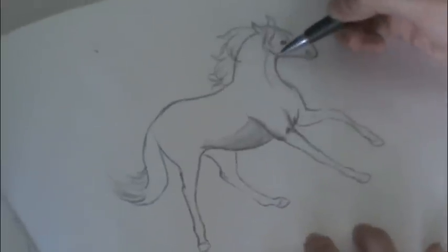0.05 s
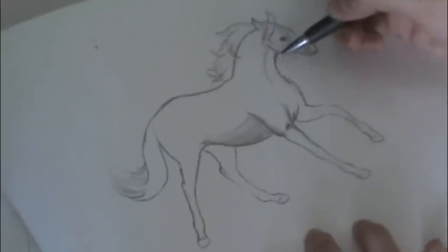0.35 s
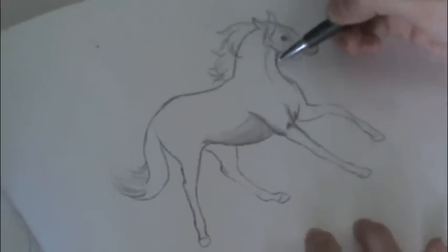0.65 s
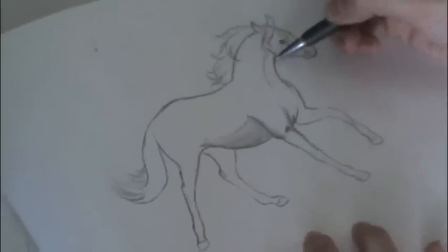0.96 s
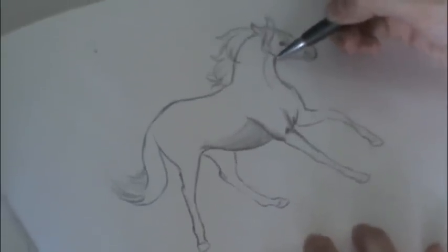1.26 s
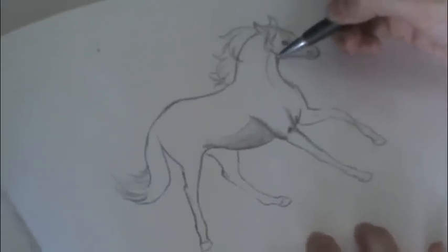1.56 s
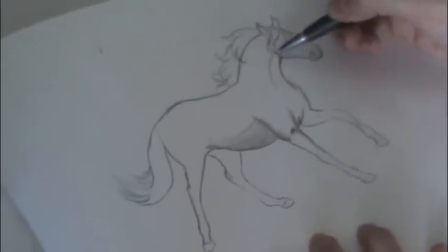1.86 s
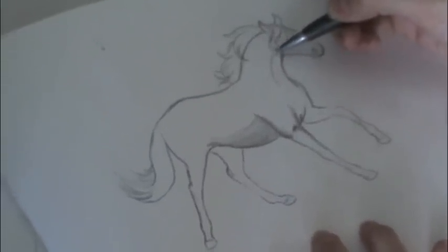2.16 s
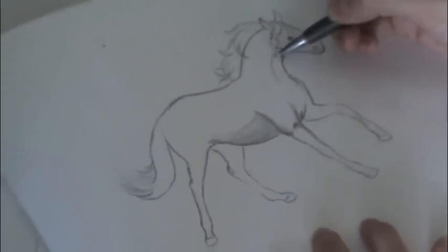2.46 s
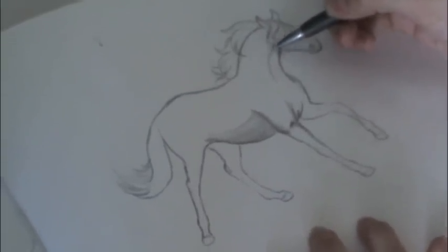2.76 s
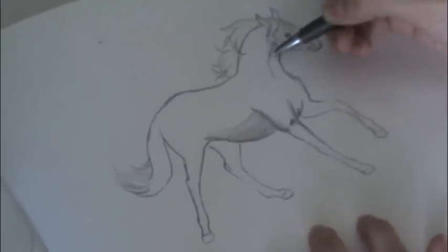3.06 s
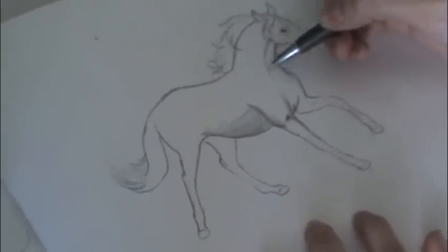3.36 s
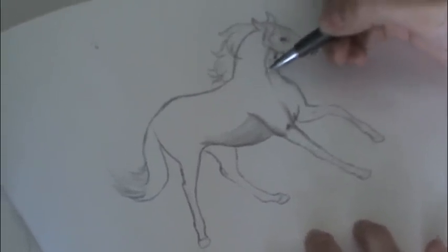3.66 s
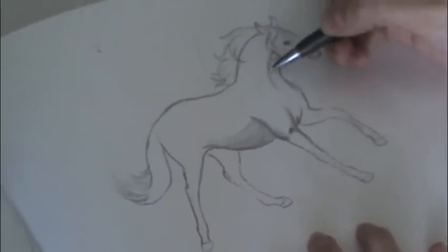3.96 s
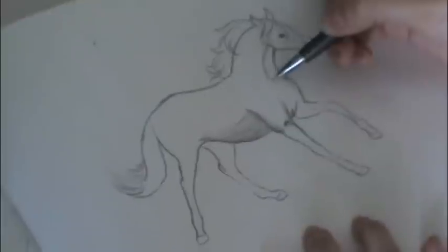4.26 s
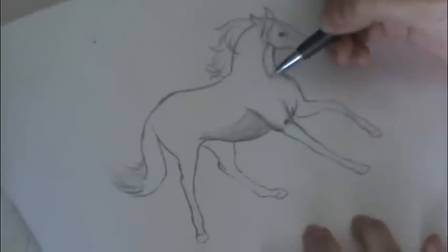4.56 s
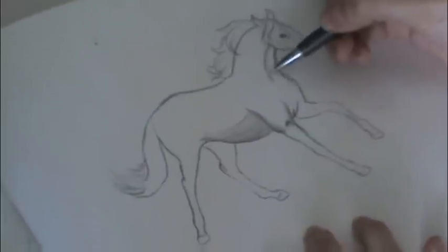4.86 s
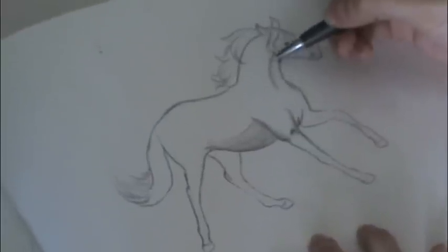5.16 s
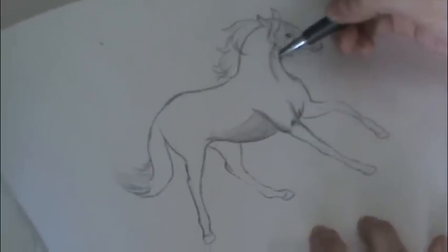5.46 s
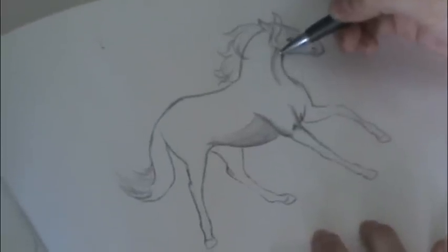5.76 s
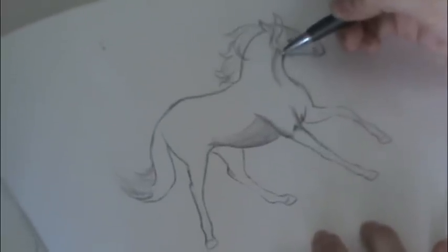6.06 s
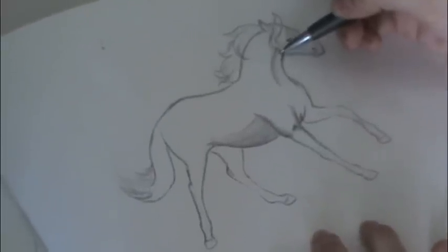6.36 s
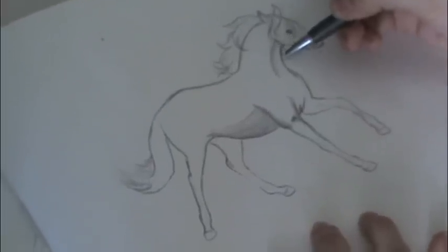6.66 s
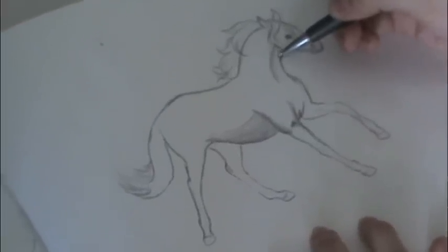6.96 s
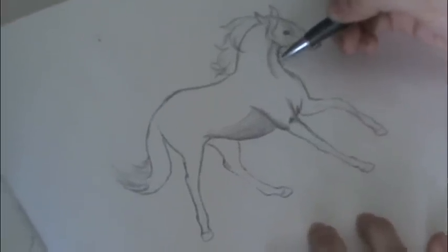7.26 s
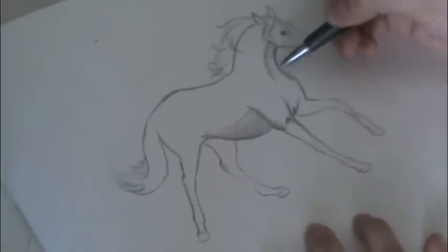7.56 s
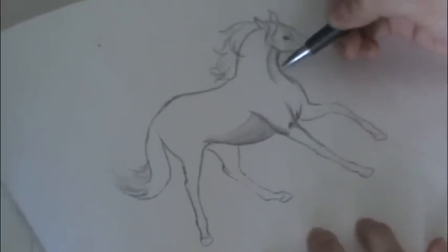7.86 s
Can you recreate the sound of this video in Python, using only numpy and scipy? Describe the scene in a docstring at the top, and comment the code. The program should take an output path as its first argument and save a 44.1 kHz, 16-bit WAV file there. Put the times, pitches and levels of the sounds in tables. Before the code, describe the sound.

A pencil shades on paper in short, quick, scratchy strokes, close up, over a low hum and soft room hiss.

```python
"""A pencil shades a drawing, close to the microphone on a desk in a small room.
Each stroke is pulled across the paper, then the lead glides back: at first the way back is all but
silent, by the end the pencil rubs evenly to and fro. The lead catches on the tooth of the paper,
pencil and sheet ring, and the desk reflects the scratch; now and then the tip knocks or snags.
Under it lie room hiss, a low electrical hum and faint electronic pips from the camera."""
import sys
import numpy as np
from scipy import signal
from scipy.fft import rfft, irfft
from scipy.io import wavfile
from scipy.ndimage import uniform_filter1d

SR = 44100
rng = np.random.default_rng(int(sys.argv[2]) if len(sys.argv) > 2 else 0)


def wav_out(sig):
    """Save sig, one row per channel (or a flat mono array), as 16-bit PCM at SR to the path in sys.argv[1]."""
    wavfile.write(sys.argv[1], SR, np.round(np.clip(np.atleast_2d(sig).T, -1, 1) * 32767).astype(np.int16))


N = 357210
TIME, FREQ = np.arange(N) / SR, np.fft.rfftfreq(N, 1 / SR)


def amp(db):
    """Decibels to gain."""
    return 10 ** (np.asarray(db) / 20)


def unit_rms(x):
    """Scales to an rms of 1."""
    return x / np.sqrt(np.mean(x ** 2) + 1e-20)


def curve_at(points, hz):
    """Interpolates rows of frequency and value on a log-frequency axis."""
    point_hz, value = np.transpose(points)
    return np.interp(np.log(hz + 1), np.log(point_hz + 1), value)


def add(mix, s, sound):
    """Adds a sound to the mix at s seconds."""
    part = mix[..., max(round(s * SR), 0):][..., :sound.shape[-1]]
    part += sound[..., :part.shape[-1]]


def wander(hz):
    """A random drift of rms 1, mostly slower than hz."""
    return unit_rms(irfft(rfft(rng.standard_normal(N)) / (1 + (FREQ / hz) ** 4), N))


def panned(db):
    """Left and right gains, the left louder by db."""
    return amp(np.array([[.5], [-.5]]) * db)


def stereo_pair(spectra, likeness):
    """Turns two unrelated spectra into left and right of the given likeness."""
    same = np.clip(curve_at(likeness, FREQ), -1, 1)
    mid, side = np.sqrt((1 + same) / 2) * spectra[0], np.sqrt((1 - same) / 2) * spectra[1]
    return np.array([mid + side, mid - side])


def hiss(level_db=-54.0, flutter_db=.5):
    """Steady noise of room and microphone, alike on both sides in the bass."""
    # The colour of the hiss. Each row: frequency in Hz, relative level in dB.
    colour = [(20, 1), (45, 3.5), (75, 1), (100, 6), (140, 7.5), (190, -4), (250, .5), (330, -0.5),
              (700, -4), (1500, -6), (3000, -11.5), (6000, -16), (15500, -21)]
    # Each row: frequency in Hz, likeness of left and right from -1 to 1.
    likeness = [(100, 1), (200, 0.74), (400, 0.024), (1200, -0.56), (3000, -0.14), (6000, 0.2),
                (12000, 0.99)]
    spectra = stereo_pair(rfft(rng.standard_normal((2, N))), likeness) * amp(curve_at(colour, FREQ))
    return amp(level_db + flutter_db * wander(24)) * unit_rms(irfft(spectra, N)) * panned(0.44)


def hum(hum_hz=58.75, drone_hz=74.4, drone_db=-62.5, waver_db=0.72, drift_rad=0.054, swell_db=1):
    """A low electrical hum grows a little and beats with a faint drone; thin whines sit above it."""
    # The hum's harmonics from the first up, each a level in dB before waver and swell.
    harmonics = [-43.5, -51.5, -73.5, -70, -76]
    # Steady whines of the electronics. Each row: frequency in Hz, level in dB.
    whines = [(360.5, -75.5), (537, -76), (780.4, -73.5), (839, -83), (1259, -74.5), (2514, -87),
              (3581, -106), (15735, -79)]
    phase = 2 * np.pi * hum_hz * TIME + drift_rad * wander(1.0)
    low = sum(amp(db) * np.cos(k * phase) for k, db in enumerate(harmonics, 1))
    low *= amp(waver_db * wander(2.8) + swell_db * (TIME / TIME[-1] - 1.5))
    low += amp(drone_db) * np.sin(2 * np.pi * drone_hz * TIME + wander(2.8))
    thin = sum(amp(db) * np.sin(2 * np.pi * hz * TIME + .5 * wander(3.9)) for hz, db in whines)
    return np.sqrt(2) * (low * panned(0.47) + thin)


def camera_pips(frames_per_s=30, length_s=.02, uneven_db=3, detune=0.0069):
    """The camera's electronics pip faintly in step with its frames, each pip a little off in pitch."""
    # Each row: start and end in seconds, pitch in Hz, typical peak in dB, pips per second.
    trains = [(.23, .37, 1390, -57, 7.5), (0.467, .94, 1377, -58, 15), (1.094, 1.32, 1400, -58, 15),
              (0.43, 1.04, 1913, -59, 15), (1.13, 1.33, 1910, -57, 15), (0.329, 1.38, 3605, -66.5, 30),
              (2.325, 3.4, 3400, -65.5, 15), (3.997, 5.24, 3600, -64, 30), (4.235, 4.45, 1397, -57, 15),
              (4.569, 5.2, 1200, -61.5, 30), (5.3, 6.74, 3085, -63.5, 30), (7.004, 8.1, 3582, -60.5, 30),
              (7.005, 8.1, 1193, -61.5, 30)]
    out, t = np.zeros((2, N)), TIME[:round(length_s * SR)]
    for start, end, hz, db, per_s in trains:
        times = np.arange(start, end, max(round(frames_per_s / per_s), 1) / frames_per_s)
        for s, (size, skew, pitch) in zip(times, rng.random((64, 3))):
            cycles = hz * (s + t + detune * (2 * pitch - 1) * (t - length_s / 2))
            stereo_shift = np.array([[0], [(skew - .5) / 2]])
            pip = np.sin(2 * np.pi * (cycles + stereo_shift)) * np.hanning(len(t))
            add(out, s - length_s / 2, amp(db + uneven_db * (2 * size - 1)) * pip)
    return out


def room(x, t60=0.25, dull_hz=7000, gap_s=.006):
    """The walls of the small room return a short, diffuse, slightly dull tail."""
    t = TIME[:SR // 2]
    tail = rng.standard_normal((2, len(t))) * 1000 ** (-t / t60) * (t > gap_s)
    wet = signal.fftconvolve(x, tail / np.linalg.norm(tail[0]), axes=1)[:, :N]
    return irfft(rfft(wet) / np.hypot(1, FREQ / dull_hz), N)


def tap(hz, octaves, t60, rise_s=0.0001):
    """One jolt of the tip: a dying band of noise, peak 1; the brighter, the more alike on both sides."""
    t = TIME[:4096]
    octaves_off = np.log2((np.fft.rfftfreq(len(t), 1 / SR) + 1) / hz)
    band = 1 / (1 + (octaves_off / octaves) ** 2)
    noise = rng.standard_normal((2, len(t))) + (1 + (hz / 3500) ** 2) * rng.standard_normal(len(t))
    burst = irfft(rfft(noise) * band) * 1000 ** (-t / t60) * (1 - np.exp(-t / rise_s))
    return burst / abs(burst).max()


def knocks_and_snags():
    """The tip knocks the sheet on the desk, or snags in mid-stroke and sets the pencil ringing."""
    # Each row: time in seconds, peak in dB before panning, centre in Hz, half-width in octaves.
    knocks = [(.207, -42.5, 1630, 0.64), (.457, -40, 2300, 1.9), (1.408, -38, 1700, 0.88),
              (2.243, -37.5, 1330, .7), (2.878, -44.5, 1610, .7), (3.484, -42.5, 2320, 0.36),
              (5.124, -43, 1720, .8), (5.394, -35.5, 1500, 2), (5.624, -42, 930, .4),
              (6.472, -41.5, 3040, .4), (6.613, -44, 1690, .4), (7.498, -46, 1300, 1.1),
              (7.548, -45, 1880, 0.45)]
    # Each row: time in seconds, peak in dB before panning.
    snags = [(2.733, -42), (3.454, -40.5), (4.774, -37), (6.918, -42), (7.350, -35)]
    out = np.zeros((2, N))
    for s, db, hz, octaves in knocks:
        add(out, s, amp(db) * panned(1.5) * tap(hz, octaves, t60=.028))
    for s, db in snags:
        add(out, s, amp(db) * panned(1) * tap(hz=7300, octaves=.16, t60=.036))
    return out


def fibre_slips(per_s=6000, spread_db=1.5):
    """Tiny slips of the lead over paper fibres, a few larger, over an equally strong smooth rub."""
    sizes = amp(spread_db * np.minimum(rng.exponential(1, N), 4.5))
    slips = sizes * (rng.random(N) < per_s / SR)
    return unit_rms(slips * rng.standard_normal((2, N))) + rng.standard_normal((2, N))


def rolling_tip(x, patch_db=2.5, patch_frames=20, patch_bins=7):
    """The contact point rolls on the lead, so the colour drifts in patches of time and pitch."""
    spectra = signal.stft(x, nperseg=512, noverlap=448)[2]
    patches = uniform_filter1d(rng.standard_normal(spectra.shape[1:]), patch_frames, axis=1)
    patches = unit_rms(uniform_filter1d(patches, patch_bins, axis=0))
    return signal.istft(spectra * amp(patch_db * patches), nperseg=512, noverlap=448)[1][:, :N]


def rubbing():
    """Lead drawn steadily over paper: fibre slips ring sheet and pencil and echo off the desk."""
    # The broad colour of lead on paper. Each row: frequency in Hz, relative level in dB.
    rasp = [(150, -30.5), (500, -1.5), (1000, -10), (1400, -18), (3200, -9), (4200, -11.5), (5600, -8),
            (9200, -7), (11000, -10), (12000, -15), (15500, -16)]
    # Resonances of sheet and pencil. Each row: centre in Hz, width in Hz, lift in dB.
    resonances = [(1703, 550, 15), (2380, 230, 11), (4500, 140, 9), (5880, 45, 4), (6360, 48, 0),
                  (7220, 630, 9), (7400, 48, -12), (7900, 99, -0.5), (7870, 66, 5), (8530, 360, 3),
                  (10160, 480, 5), (14000, 400, 0)]
    # Reflections from desk, hand and camera. Each row: delay in seconds, signed gain.
    echoes = [(.001338, -.2), (.002041, -.16), (.002698, -.14), (.007755, -.18), (.008186, .27)]
    # Each row: frequency in Hz, likeness of left and right from -1 to 1.
    likeness = [(500, 1), (1200, -0.057), (1800, 1), (3000, 0.78), (5000, 0.93), (8000, 0.94), (14000, 1)]
    # The balance at the microphone. Each row: frequency in Hz, left over right in dB.
    balance = [(1000, -0.5), (2000, 2.5), (4000, 0.5), (7000, 2), (8500, 0.5), (12000, 0)]
    slips = stereo_pair(rfft(fibre_slips()), likeness)
    ring_db = sum(db / (1 + (2 * (FREQ - hz) / width) ** 2) for hz, width, db in resonances)
    colour_db = curve_at(rasp, FREQ) + ring_db
    # minimum phase: the ringing follows each slip
    log_gain = np.log(amp(np.r_[colour_db, colour_db[-2:0:-1]]))
    body = np.exp(np.conj(signal.hilbert(log_gain)))[:len(FREQ)]
    reflections = 1 + sum(gain * np.exp(-2j * np.pi * FREQ * s) for s, gain in echoes)
    at_microphone = slips * body * reflections * panned(curve_at(balance, FREQ))
    return unit_rms(rolling_tip(irfft(at_microphone, N)))


def lead_pass(rub, s, length_s, db, lean_db, firm_db=-52.5, edge_hz=9400, edge_db=1.9, edge_rise_db=4):
    """One pass swells and fades; the light touch at its ends, most as it lifts, leaves a fine edge."""
    # The colour drifts as the lead wears and turns.
    # Each row: time in seconds, then lifts in dB of the sheet's body, coarse rasp and fine treble.
    wear = [(0, 1, 2, -5.5), (2.9, 1.5, 5, -2), (3.7, -2, -1, -1.5), (4.7, 1.5, 2, 0), (5.4, -1.5, 2.5, -2),
            (6.2, -3.5, 0, -2.5), (6.9, -1.5, 4, -7), (8.1, -5.5, -6, -5.5)]
    progress = np.linspace(0, 1, round(length_s * SR))
    hz = np.fft.rfftfreq(len(progress), 1 / SR)
    pressure = abs(np.sin(np.pi * progress))
    times, *bands = np.transpose(wear)
    body_db, rasp_db, treble_db = (np.interp(s, times, band) for band in bands)
    # a lighter touch rings the pencil less, so the bands either side of its ring stand out
    lighter_db = firm_db - db
    colour = [(4000, body_db + 0.27 * lighter_db), (6200, rasp_db + 0.17 * lighter_db),
              (7200, 0), (8300, 0), (10300, treble_db + 0.52 * lighter_db)]
    spectra = rfft(rub[:, round(s * SR):][:, :len(progress)]) * amp(curve_at(colour, hz))
    below_edge = 1 / (1 + (hz / edge_hz) ** 20)
    body = irfft(spectra * below_edge, len(progress)) * pressure ** 0.83
    edge = irfft(spectra * (1 - below_edge), len(progress)) * pressure ** 0.7
    edge *= amp(edge_db + edge_rise_db * (progress - .5))
    return (body + edge) * amp(db + lean_db * (progress - .5))


def shading(gain_db=.5, back_ratio=1.07, back_lean_db=-1.6, shortest_s=.02):
    """Every stroke is a pull and then a glide back, cut short if the next stroke comes first."""
    # Each row: start and length of the pull in seconds, base levels of pull and way back in dB.
    strokes = [(0.253, 0.12, -55.5, -85), (0.632, 0.09, -51, -83), (0.979, 0.088, -56, -83),
               (1.219, 0.088, -56.5, -70), (1.415, 0.077, -64, -72), (1.612, 0.079, -58.5, -66),
               (2.018, 0.074, -53, -63), (2.228, 0.092, -53.5, -64.5), (2.429, 0.11, -50, -64.5),
               (2.646, 0.13, -50, -61), (2.88, 0.13, -49.5, -63), (3.112, 0.11, -49, -82),
               (3.35, 0.152, -50, -75), (3.566, 0.13, -54.0, -65), (3.734, 0.13, -51, -68),
               (3.939, 0.16, -49, -70), (4.151, 0.141, -55.5, -77), (4.351, 0.17, -51, -53),
               (4.7, 0.15, -52.5, -56.5), (4.952, 0.12, -56, -58.5), (5.171, 0.1, -49.5, -55.5),
               (5.357, 0.11, -51.5, -55), (5.538, 0.114, -50.5, -56.5), (5.726, 0.086, -54, -58.5),
               (5.886, 0.073, -57.5, -63), (6.05, 0.069, -61, -55.5), (6.275, 0.085, -58, -57.5),
               (6.452, 0.11, -53.5, -53.5), (6.662, 0.097, -51, -53.5), (6.881, 0.1, -49.0, -53),
               (7.088, 0.11, -48.5, -51), (7.302, 0.11, -48, -53), (7.538, 0.118, -48.5, -50),
               (7.78, 0.14, -49.5, -46), (8.014, 0.14, -49, -63)]
    # Where the hand puts its weight. Each row: time in seconds, rise over one pull in dB.
    lean = [(0, 17), (2.3, -0.5), (2.9, -5.5), (3.3, 8.5), (4.7, 5.5), (5.4, -3), (6.3, 4), (6.9, -1),
            (8.1, -13)]
    rub = np.pad(rubbing(), ((0, 0), (0, SR)), "reflect")
    out = np.zeros((2, N))
    next_starts = [row[0] for row in strokes[1:]] + [np.inf]
    for (s, pull_s, pull_db, back_db), next_s in zip(strokes, next_starts):
        lean_db = np.interp(s, *np.transpose(lean))
        add(out, s, lead_pass(rub, s, pull_s, pull_db, lean_db))
        turn_s = s + pull_s
        back_s = max(min(back_ratio * pull_s, next_s - turn_s), shortest_s)
        add(out, turn_s, lead_pass(rub, turn_s, back_s, back_db, back_lean_db))
    return amp(gain_db) * out


def scene(room_db=-9):
    """The pencil close to the microphone, over the sounds of room and camera."""
    pencil = shading() + knocks_and_snags()
    return pencil + amp(room_db) * room(pencil) + hum() + camera_pips() + hiss()


def record(dry, cutoff_hz=15850):
    """The recorder cuts off the highest treble steeply."""
    lowpass = signal.firwin(1023, cutoff_hz, window=("kaiser", 9), fs=SR)
    return signal.oaconvolve(dry, lowpass[None], "same")


dry = scene()
out = record(dry)
wav_out(out)
```